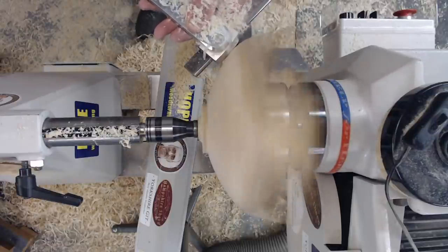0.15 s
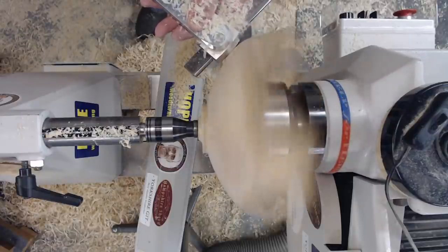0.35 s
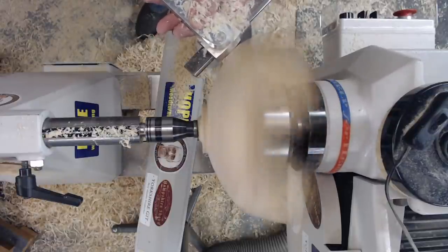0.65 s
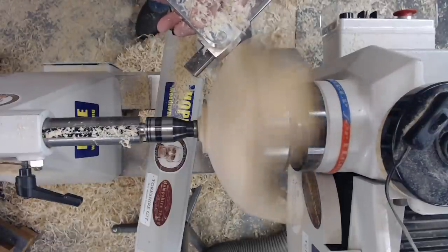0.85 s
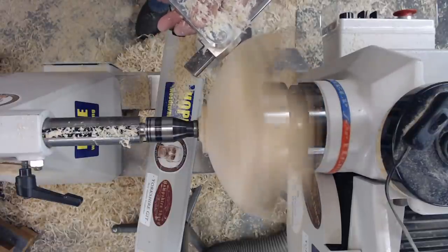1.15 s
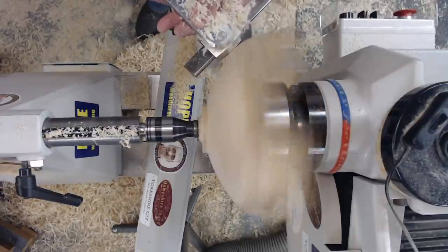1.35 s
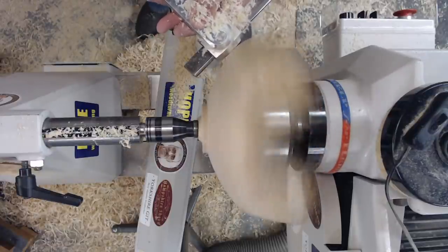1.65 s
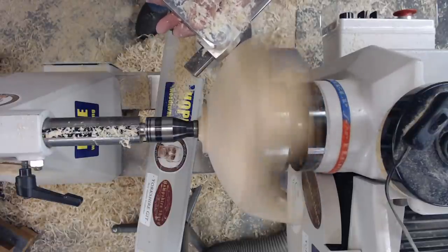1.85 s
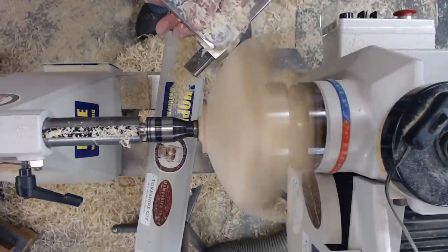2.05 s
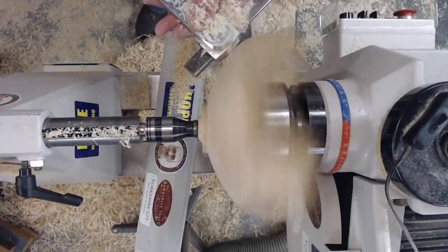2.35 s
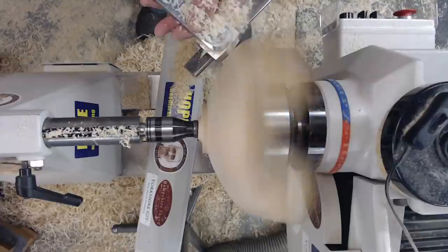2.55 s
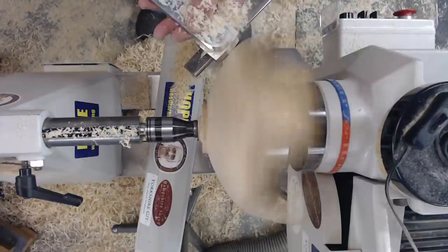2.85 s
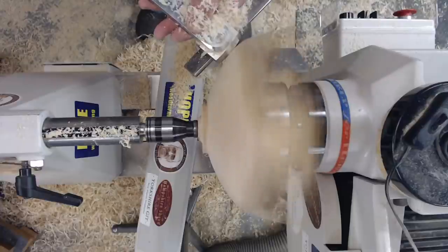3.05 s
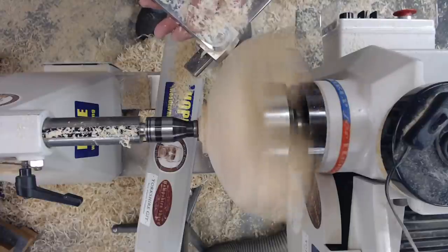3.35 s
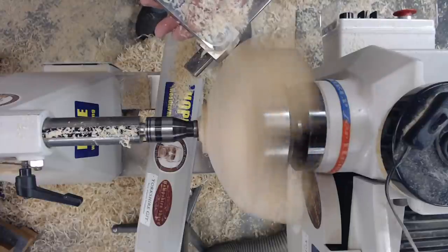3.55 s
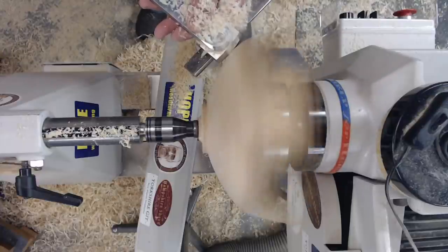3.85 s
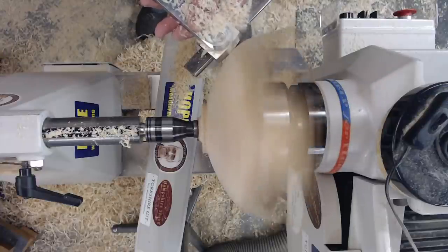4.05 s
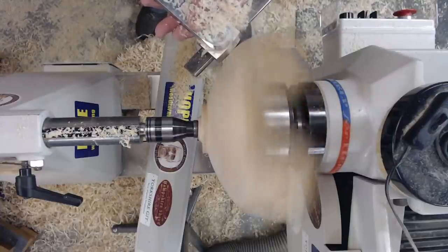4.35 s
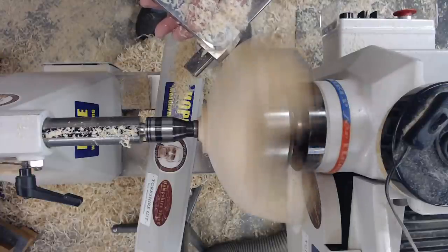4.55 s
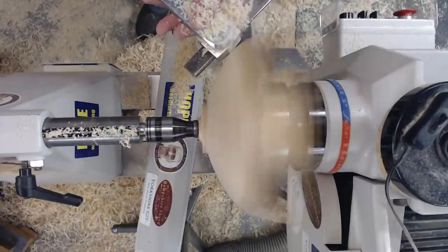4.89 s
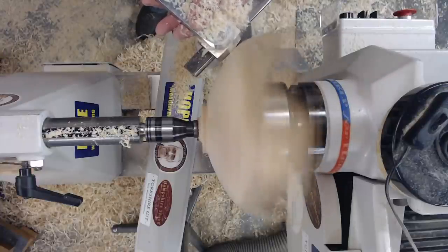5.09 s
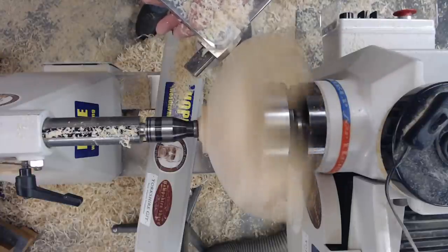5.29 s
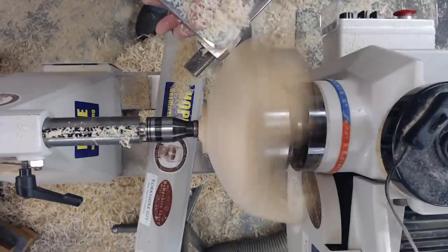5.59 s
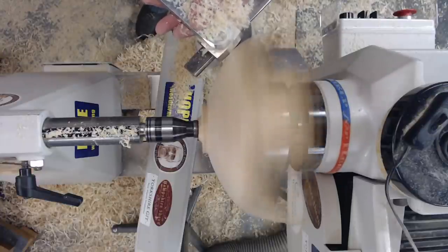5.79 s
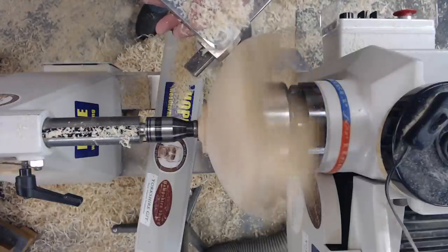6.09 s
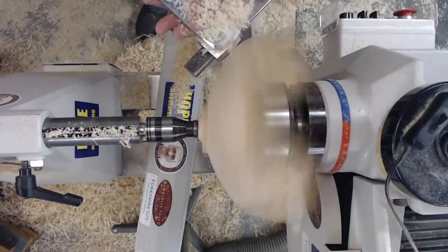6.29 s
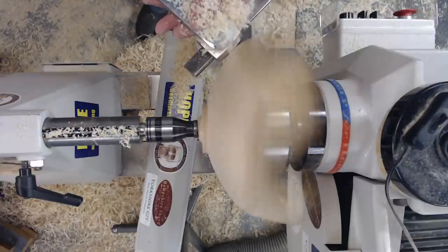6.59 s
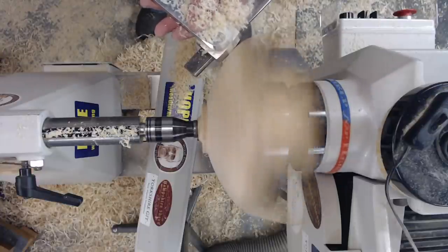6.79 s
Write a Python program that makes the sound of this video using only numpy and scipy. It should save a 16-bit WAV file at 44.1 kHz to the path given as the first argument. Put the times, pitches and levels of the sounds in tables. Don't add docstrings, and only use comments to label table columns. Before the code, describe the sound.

Close in a small workshop, a steel scraper rides a wooden bowl turning on a lathe. Once per turn, about fourteen times a second, a ridge knocks the blade: a hard woody clack, a brief bright hiss of torn fibres, then a light landing. Strength shifts as the hand rocks the tool. After six and a half seconds the strokes thin to faint touches, leaving the lathe's low hum and thin whine.

```python
import sys
import numpy as np
from scipy import signal
from scipy.fft import rfft, irfft
from scipy.io import wavfile
from scipy.ndimage import uniform_filter1d

SR = 44100
rng = np.random.default_rng(int(sys.argv[2]) if len(sys.argv) > 2 else 0)


def field_ratio(decibels):
    return 10 ** (np.asarray(decibels, dtype=float) / 20)


def wav_record(signal):
    frames = np.transpose(np.atleast_2d(signal))
    bounded = np.clip(frames, -1, 1)
    quanta = np.round(bounded * 32767).astype(np.int16)
    wavfile.write(sys.argv[1], SR, quanta)


N = 305613
T = np.arange(N) / SR
TURN = 3046
LIFTED_S = 6.52


def evened(x):
    return x / np.sqrt(np.mean(x ** 2) + 1e-20)


def read(points, hz):
    f, value = np.transpose(points)
    return np.interp(np.log(hz + 1), np.log(f + 1), value)


def follow(curve, s):
    return [np.interp(s, np.transpose(curve)[0], column) for column in np.transpose(curve)[1:]]


def spectral_gain(points):
    return field_ratio(read(points, np.fft.rfftfreq(N, 1 / SR)))


def colour(x, points):
    return irfft(rfft(x) * evened(spectral_gain(points)), N)


def ring(x, modes, stagger_ms=0):
    delay = stagger_ms / 1000 * rng.random(len(modes))
    t = np.maximum(np.arange(4096)[:, None] / SR - delay, 0)
    hz, width, db = np.transpose(modes)
    decay = np.exp(-np.pi * width * t)
    shape = (field_ratio(db) * np.sqrt(width) * decay * np.sin(2 * np.pi * hz * t)).sum(axis=1)
    return signal.oaconvolve(x, shape / np.linalg.norm(shape))[:N]


def resonate(x, hz, width):
    carrier = np.exp(2j * np.pi * np.cumsum(hz) / SR)
    r = np.exp(-np.pi * width / SR)
    return 2 * (carrier * signal.lfilter([(1 - r) ** 2], [1, -2 * r, r ** 2], x / carrier)).real


def grain(keep, grit_db):
    size = (N // TURN + 9, TURN)
    fibre_db = grit_db * np.minimum(rng.exponential(1, size), 5)
    fibres = rng.standard_normal(size) * field_ratio(fibre_db)
    surface = signal.lfilter([1], [1, -min(keep, .95)], fibres, axis=0)[8:]
    return evened(surface.ravel()[:N])


def contact(s, db, rise_ms, fall_ms, blunt=0.7):
    power = np.zeros(N + 9000)
    ms = np.arange(-1500, 3000) / SR * 1000
    for at, level_db, rise, fall in np.broadcast(s, db, rise_ms, fall_ms):
        rising = np.exp(-.5 * (ms / rise) ** 2)
        falling = np.exp(-.5 * (abs(ms) / fall) ** blunt)
        start = round(at * SR)
        power[start:start + len(ms)] += (field_ratio(level_db) * np.where(ms < 0, rising, falling)) ** 2
    return np.sqrt(power[1500:N + 1500])


def impulses(s, db):
    out = np.zeros(N)
    out[np.round(s * SR).astype(int)] = field_ratio(db)
    return out


# (frequency [Hz], level [dB per Hz])
RUNNING = [(15, 6), (35, -19), (48, 6), (100, -8), (130, -5.5), (250, -19), (500, -7.5), (1000, -5.5),
           (2000, -13), (4300, -22.5), (8000, -18), (10000, -33), (11300, -22), (12000, -48), (16000, -50)]
# (frequency [Hz], width [Hz], level [dB])
CASING_MODES = [(277, 14, -57), (350, 30, -63), (597, 25, -63), (683, 10, -61), (2519, 20, -62)]
# (frequency [Hz], level [dB])
DRIVE_TONES = [(9146, -62), (9259, -66), (9717, -62), (9830, -65), (9943, -58), (10056, -67), (10169, -59),
               (10228, -68)]


def lathe():
    out = field_ratio(-50.5) * colour(rng.standard_normal(N), RUNNING)
    for hz, width, db in CASING_MODES:
        out += field_ratio(db) * ring(rng.standard_normal(N), [(hz, width, 0)])
    drifts = rng.standard_normal((2, N))
    wobble, lumps = (evened(uniform_filter1d(uniform_filter1d(v, 2500), 2500)) for v in drifts)
    phase = 4 * np.pi * T * SR / TURN + 2.4 + .25 * wobble
    out += np.sqrt(2) * field_ratio(-44 + 0.35 * lumps) * np.cos(phase)
    floor_shape = [(2, -20), (5, 0), (16, 0), (26, -40), (60, -140)]  # (Hz, dB)
    out += field_ratio(-47) * colour(rng.standard_normal(N), floor_shape)
    for hz, db in DRIVE_TONES:
        out += np.sqrt(2) * field_ratio(db) * np.sin(2 * np.pi * (hz * T + rng.random()))
    return out


# (time [s], low rest mode [dB], high rest mode [dB], light rubbing [dB])
HAND_LEVELS = [(0.0, -49, -38.5, -49), (0.52, -54, -54.5, -63), (1.0, -46, -46.5, -61.5),
               (2.3, -49.5, -51, -58.5), (3.11, -53.5, -48, -55), (3.57, -50.5, -39, -56.5),
               (4.3, -52.5, -41, -60.5), (4.9, -49, -44, -58.5), (5.5, -50.5, -40, -59),
               (6.29, -49.5, -40, -57.5), (6.62, -51, -47.5, -80), (6.93, -90, -77, -66)]


def hand(control):
    return field_ratio(follow(HAND_LEVELS, T)[control])


# (frequency [Hz], width [Hz], delay after the ridge [ms])
REST_MODES = [(425, 90, 20.0), (515, 50, 8.0)]


def tool_rest():
    hold_s, sag_hz_per_s = .014, 1900
    since = (np.arange(N) + 900) % TURN / SR - 900 / SR - .006
    out = np.zeros(N)
    for control, (hz, width, after_ms) in enumerate(REST_MODES):
        apart = since - after_ms / 1000
        loaded = np.exp(-(abs(apart) / hold_s) ** 4)
        wander = 0.6 * evened(uniform_filter1d(rng.standard_normal(N), size=8000))
        phase = 2 * np.pi * (hz - sag_hz_per_s / 2 * apart) * apart + wander
        struck = evened(loaded * np.cos(phase))
        shaken = ring(grain(0.54, 1.15) * evened(0.85 + loaded), [(hz, width, 0)])
        out += hand(control) * (field_ratio(-2.5) * struck + field_ratio(-5.5) * shaken)
    return out


# (time [s], knock level [dB], deepest cut's place in the turn [ms])
BLADE_ANGLE = [(0, -27, 8.3), (.14, -18, 9.4), (.3, -17.5, 6.3), (.56, -19.5, 7.2), (.72, -14.5, 10),
               (.83, -9, .6), (1.35, -15.5, 0.59), (1.45, -14.5, 3), (1.95, -14.5, 3.5), (2.35, -9.5, 5.8),
               (2.63, -18.5, 9.5), (2.9, -26, 11), (3.5, -15, 7.7), (3.83, -29, 12.8), (4.12, -12, 6.5),
               (4.5, -21.5, 9.4), (4.72, -11, 7.2), (6.5, -17.5, 8.5)]
# (time [s], cut level [dB], level passed to the bowl [dB])
HAND_PRESSURE = [(0, -23.5, -32), (.4, -27, -26.5), (.6, -23, -25.5), (.72, -36, -40), (.83, -24.5, -25.5),
                 (1.45, -30, -34), (2.02, -23, -31), (2.5, -21.5, -25.5), (3.0, -23.5, -33),
                 (3.3, -19.5, -24.5), (3.7, -25, -30.5), (3.93, -26, -33), (4.8, -27, -28),
                 (5.2, -24.5, -34), (5.4, -28, -41), (5.62, -26.5, -29.5), (6.15, -27, -35.5),
                 (6.45, -28.5, -30)]
# (time [s], knock level [dB], extra cut [dB])
SLIPPED_TURNS = [(0.4882, -23, -1), (0.6302, -19, 4.5), (1.0398, -12.5, 4), (1.1078, -13, -1),
                 (1.1776, -10.5, -3), (1.864, -18, -8), (2.0744, -11.5, -1.5), (2.7687, -26, -1),
                 (2.8377, -38, -1), (2.9772, -21, 0), (3.0468, -24, 0.5), (3.181, -23, -2),
                 (3.387, -27, -2.5), (3.6676, -33, 3.5), (3.7365, -38, -0.5), (3.7986, -24, 5),
                 (4.3551, -13.5, 0), (4.4926, -29, 1.5), (4.6313, -18, 3.5), (4.84, -13, -0.5),
                 (4.9767, -12.5, 1), (5.0457, -18.5, 0.5), (5.7368, -23, 1), (6.1495, -23, 1),
                 (6.4261, -17, -1.5), (6.497, -20, -1.5)]
# (time [s], knock level [dB], cut level [dB], spread [ms], bowl level [dB])
PARTING = [
    (6.57, -40, -23.5, 0.9, -33),
    (6.7779, -29, -21.5, 0.63, -27),
    (6.8526, -31, -35, 2.6, -30.5),
]


def ridge():
    turn = np.arange(0, LIFTED_S, TURN / SR)
    chance = rng.standard_normal((len(turn), 4)).T
    knock_db, place_ms = follow(BLADE_ANGLE, turn)
    cut_db, bowl_db = follow(HAND_PRESSURE, turn)
    tilted = (turn > 0.66) & (turn < 1.62)
    knock_ms = np.where(tilted, -0.6, 3.3)
    s = turn + (knock_ms + .3 * chance[0]) / 1000
    knock_db, cut_db, bowl_db = np.array([knock_db, cut_db, bowl_db]) + 0.58 * chance[1:]
    for at, slip_db, extra_db in SLIPPED_TURNS:
        k = round(at * SR / TURN)
        s[k] = at
        knock_db[k] = slip_db
        cut_db[k] += extra_db
    centre_ms = np.maximum(place_ms - 1000 * (s - turn), .9)
    spread_ms = 2.82 - 0.34 * (cut_db + 25) + 0.24 * np.minimum(place_ms - 8.7, 0)
    rows = np.vstack([np.transpose([s, knock_db, cut_db, spread_ms, bowl_db]), PARTING])
    return (*rows.T, np.append(centre_ms, np.full(len(PARTING), 3.3)))


# (time [s], level [dB], place in the turn [ms])
RAMP_GRAZES = [(0, -29, -6.5), (.6, -24.5, -6), (.7, -24, -4), (1.05, -46, -5.5), (1.72, -27, -3),
               (2.95, -40, -2.5), (3.1, -28, -9.5), (3.55, -21.5, -4.5), (3.73, -37, 0.1), (4.1, -21.5, 0),
               (4.45, -54, -11.5), (4.87, -37, -1), (5.38, -22.5, -2), (5.58, -47, -5), (5.8, -34, -4),
               (6.02, -48, -1), (6.3, -20.5, -4.5), (6.5, -41, -3)]
# (time [s], level [dB])
LANDINGS = [(0, -27), (.33, -29), (.52, -27), (.62, -46), (2.6, -45), (3.0, -30.5), (3.6, -38.5),
            (3.85, -32), (4.15, -31), (4.75, -27), (5.3, -27.5), (6.6, -31.5)]
# (time [s], level [dB])
LONE_LANDINGS = [
    (2.04, -27),
    (2.384, -34),
    (6.598, -35),
    (6.8078, -25.5),
    (6.927, -41),
]


def grazes():
    turn = np.arange(0, LIFTED_S, TURN / SR)
    ramp_db, place_ms = follow(RAMP_GRAZES, turn[1:])
    lands = turn + 0.03535
    sway = np.cos(2 * np.pi * (lands - 4.17) / .565)
    land_db = follow(LANDINGS, lands)[0] + 6.0 * (lands > 2.7) * sway
    stray_s, stray_db = np.transpose(LONE_LANDINGS)
    leads = (turn[1:] + place_ms / 1000, ramp_db)
    bounces = (np.append(lands, stray_s), np.append(land_db, stray_db))
    return leads, bounces


# (frequency [Hz], level [dB])
SHAVING_SHAPE = [(300, -22), (1500, -21), (4000, -12.5), (6500, -5), (9000, 1), (10500, -6.5), (13000, -10),
                 (15800, -39), (17000, -42)]
# (frequency [Hz], width [Hz], level [dB])
KNOCK_MODES = [(1162, 160, -5.5), (1906, 60, -1), (2640, 40, -5), (2856, 220, -0.5), (3200, 170, 3),
               (3805, 290, 9), (4184, 340, -2), (4600, 190, 6), (5340, 260, 0), (5600, 920, 2),
               (6620, 1600, -5), (7700, 1200, 7)]


def knocked_bowl(s, knock_db, knock):
    out = np.zeros(N)
    for delay_ms, blow_db in [(.4, 12.14), (1.7, 9.4), (3.4, 11)]:
        late_ms, spread_db = rng.standard_normal((len(s), 2)).T
        blow_s = s + (delay_ms + .12 * late_ms) / 1000
        blow = impulses(blow_s, knock_db + blow_db + 0.91 * spread_db)
        out += ring(blow, KNOCK_MODES, stagger_ms=1.281)
    out += field_ratio(-17.5) * ring(grain(0.47, 0.45) * knock, KNOCK_MODES)
    return out + field_ratio(-16.5) * colour(grain(0.56, 0.77) * knock, SHAVING_SHAPE)


# (frequency [Hz], width [Hz], level [dB])
RIM_MODE = [(1123, 205, 0)]


def rim(s, knock_db, leads, knock, lead, bounce):
    rough = field_ratio(-10) * lead + field_ratio(-8.5) * bounce + field_ratio(-17.0) * knock
    tap = impulses(np.append(leads[0], s), np.append(leads[1] + 5.4, knock_db - 4.5))
    return ring(grain(0.89, 0.64) * rough, RIM_MODE) + ring(tap, RIM_MODE)


# (frequency [Hz], width [Hz], level [dB])
EDGE_MODES = [(7850, 730, -12), (8600, 140, 7), (9150, 270, -34), (9500, 470, 10.5), (10600, 400, -53),
              (13980, 350, -1)]


def blade_edge(cut, graze, rub, since_ms):
    torn = grain(0.82, 4.1) * (cut + field_ratio(-10) * graze + rub)
    out = colour(torn, SHAVING_SHAPE)
    edge_force = cut + field_ratio(-24) * graze + field_ratio(-11) * rub
    out += field_ratio(-2.5) * ring(grain(0.84, 1.06) * edge_force, EDGE_MODES)
    squeal_hz = 8300 + 110 * np.clip(since_ms, 0, 16)
    out += field_ratio(-3) * resonate(torn, squeal_hz, 1000)
    thin = colour(grain(0.97, 2.2) * graze, SHAVING_SHAPE)
    return out + field_ratio(-3.5) * np.gradient(np.gradient(thin))


# (frequency [Hz], width [Hz], level [dB])
CUT_MODES = [(1070, 610, -24), (1202, 120, 6.5), (1860, 160, -7), (2430, 43, -3), (2590, 130, 10),
             (2740, 155, 8), (3282, 270, 9.5), (3827, 200, 9), (4453, 93, 4), (5030, 210, -12)]


def scraped_bowl(cut_bowl, graze, rub, bounces):
    force = grain(0.62, 2.96) * (cut_bowl + field_ratio(-7.5) * graze + field_ratio(-5.5) * rub)
    share = np.pi / 4 * (1 + np.sin(2 * np.pi * T / 1.145 + 1.12))
    lean = 0.5 * np.outer((-1) ** (np.arange(len(CUT_MODES)) // 2), [0, 0, 1])
    modes = np.array(CUT_MODES)
    out = ring(force * np.cos(share), modes + lean) + ring(force * np.sin(share), modes - lean)
    ping = impulses(bounces[0], bounces[1] + 3.0)
    return out + ring(ping, CUT_MODES[3:6])


# (time [s], level [dB])
GRIP_LEVEL = [(0.0, -41.5), (0.31, -49.5), (0.56, -43), (0.64, -40), (0.73, -57), (1.0, -67), (1.83, -49),
              (2.54, -65), (2.58, -44), (2.95, -53.5), (4.77, -48.5), (5.22, -53), (5.28, -41.5),
              (5.67, -58.5), (5.77, -48.5), (6.6, -55), (6.7, -63), (6.87, -49)]
# (frequency [Hz], width [Hz], level [dB])
SHANK_MODES = [(1558, 60, -1), (2350, 170, -5.5), (2685, 360, -15.5)]


def shank(s, cut, bounce):
    exit_s = np.round(s * SR / TURN) * TURN / SR + .0135
    late = evened(contact(exit_s, 0, 0.19, 2.2) + contact(s + 0.0069, -8, 2.2, 3.9) + 0.026)
    grip = field_ratio(follow(GRIP_LEVEL, T)[0] + 4.0)
    force = grip * (late + field_ratio(31) * cut) + field_ratio(-24.5) * bounce
    return ring(grain(0.81, 1.0) * force, SHANK_MODES)


def bite(since_ms):
    bitten = np.where(since_ms < 35, np.clip(0.19 + since_ms, 0, 1), .35)
    turn_ms = np.arange(N) % TURN / SR * 1000
    return bitten * (1 - 0.61 * (turn_ms < 55) / (1 + np.exp((19.5 - turn_ms) / 0.29)))


# (frequency [Hz], level [dB])
TOOL_PATH = [(100, -58), (300, -15.5), (450, 7), (800, -12.5), (1100, -3.25), (10000, -2.03), (16000, -9.5)]


def scraper():
    s, knock_db, cut_db, spread, bowl_db, centre_ms = ridge()
    leads, bounces = grazes()
    spread = np.maximum(spread, .8)
    since_ms = 1000 * (T - np.append(-1, s)[np.searchsorted(s, T)])
    bitten = bite(since_ms)
    cut_s = s + centre_ms / 1000

    knock = contact(s + 0.0009, knock_db - 6.5, 0.07, 0.48)
    cut = bitten * contact(cut_s, cut_db - 0.5, 2.1 * spread, 2.3 * spread, 1.95)
    cut_bowl = bitten * contact(cut_s + 0.0022, bowl_db + 0.05, 1.7 * spread, 1.3 * spread + 2.8, 1.3)
    cut_bowl += contact(bounces[0], bounces[1] - 16, 7.8, 3.0, 1.8)
    lead = contact(*leads, 1.28, 2.7)
    bounce = contact(*bounces, 1.7, 0.94)
    graze = lead + bounce
    rub = hand(2) * field_ratio(11.5) * (0.4 + contact(s + 0.038, 0, 1.3, 4.1))

    out = knocked_bowl(s, knock_db, knock)
    out += rim(s, knock_db, leads, knock, lead, bounce)
    out += blade_edge(cut, graze, rub, since_ms)
    out += scraped_bowl(cut_bowl, graze, rub, bounces)
    out += shank(s, cut, bounce)
    return irfft(rfft(out) * spectral_gain(TOOL_PATH), N)


# (frequency [Hz], decay time to -60 dB [s])
ROOM_DECAY = [(300, 0.66), (1500, 0.17), (4000, 0.18), (10000, 0.11), (16000, 0.17)]


def room(x):
    taps = np.zeros(SR // 2)
    at = np.arange(120, len(taps) - 20, 20)
    taps[at + rng.integers(0, 20, len(at))] = rng.choice([-1., 1.], len(at))
    hz, t, z = signal.stft(taps, SR, nperseg=256)
    decay = field_ratio(-60 * t / read(ROOM_DECAY, hz)[:, None])
    tail = signal.istft(z * decay, SR, nperseg=256)[1]
    return signal.oaconvolve(x, tail / np.linalg.norm(tail))[:N]


def scene():
    tool = scraper()
    rest = tool_rest()
    reflections = room(field_ratio(-9.5) * tool + field_ratio(-11.0) * rest)
    return (tool + rest + reflections + lathe())[None]


def roll_off(x):
    return signal.sosfilt(signal.butter(12, 16450, fs=SR, output="sos"), x)


def record(dry):
    softened = .42 * np.tanh(dry / .42)
    low_pass = signal.firwin(255, 15900, window=("kaiser", 9), fs=SR)
    limited = signal.oaconvolve(softened, low_pass[None], "same")
    return roll_off(limited)


dry = scene()
out = record(dry)
wav_record(out)
```